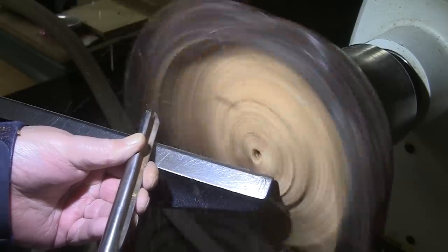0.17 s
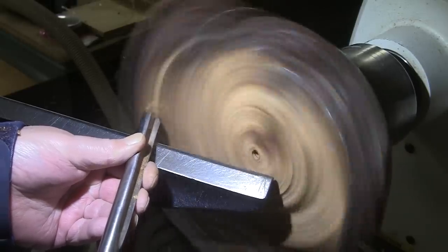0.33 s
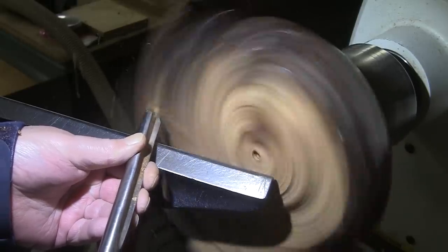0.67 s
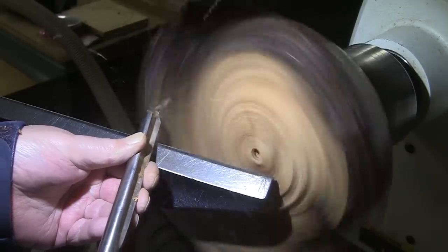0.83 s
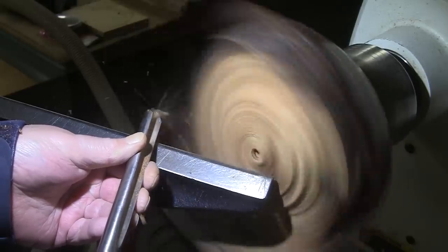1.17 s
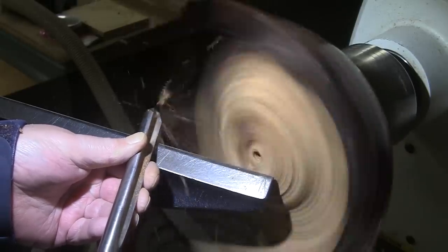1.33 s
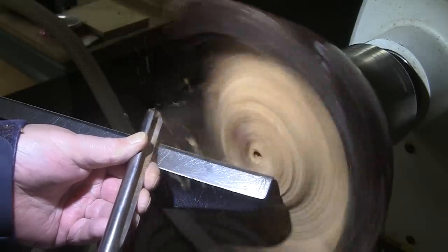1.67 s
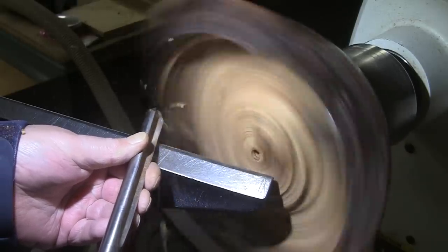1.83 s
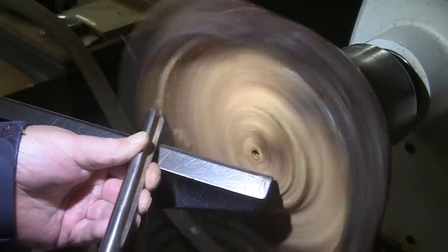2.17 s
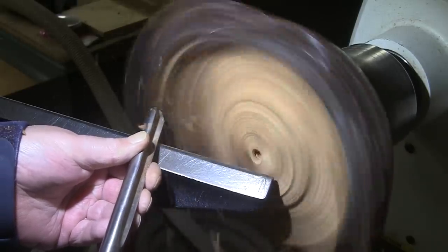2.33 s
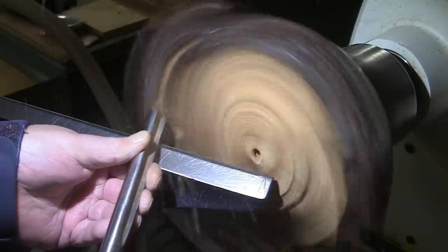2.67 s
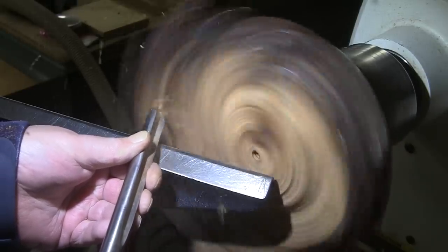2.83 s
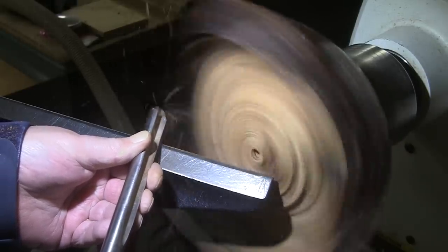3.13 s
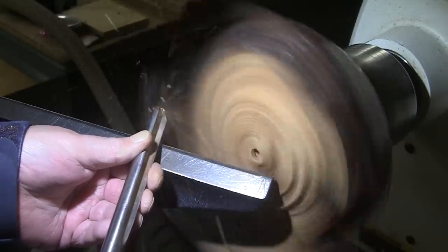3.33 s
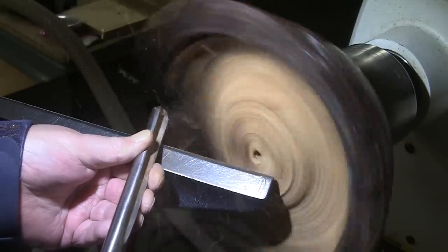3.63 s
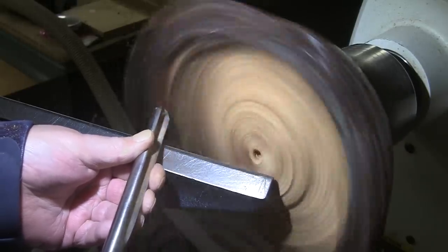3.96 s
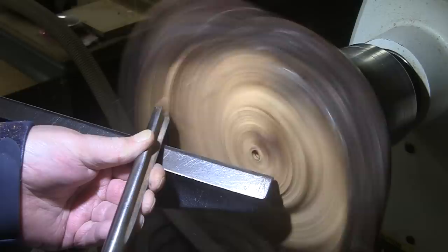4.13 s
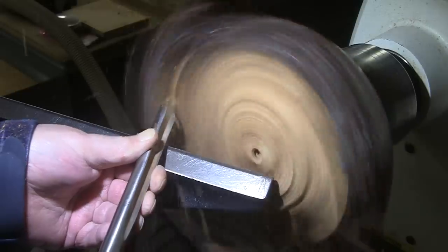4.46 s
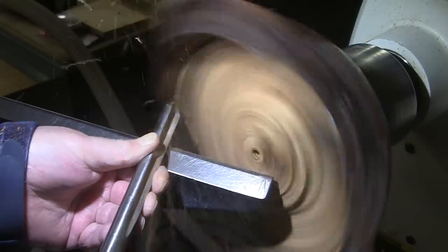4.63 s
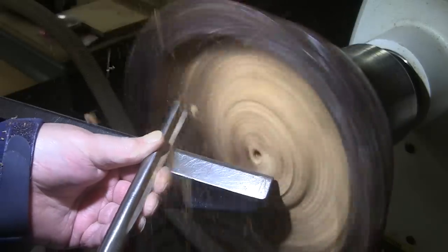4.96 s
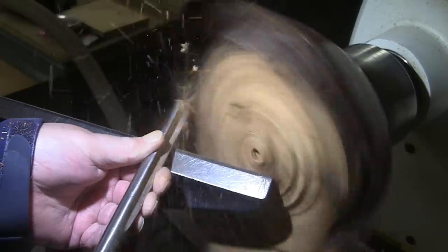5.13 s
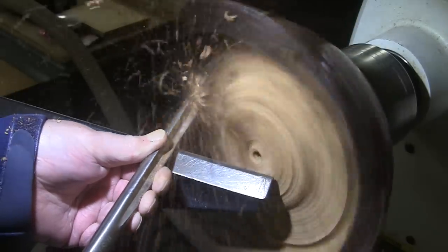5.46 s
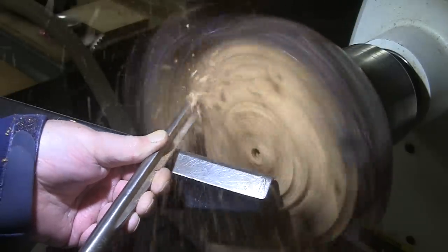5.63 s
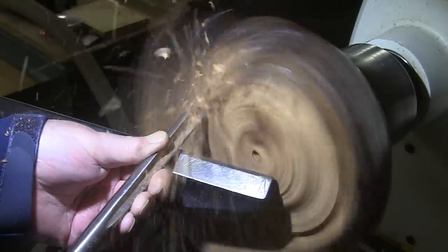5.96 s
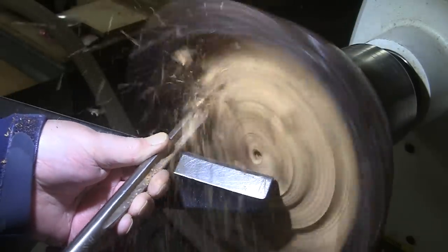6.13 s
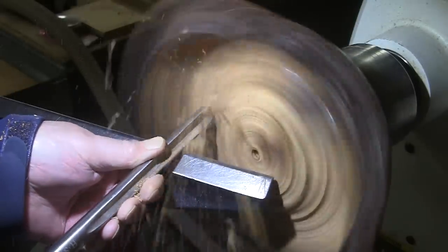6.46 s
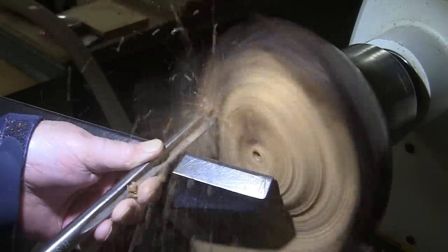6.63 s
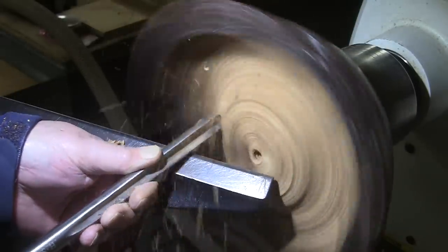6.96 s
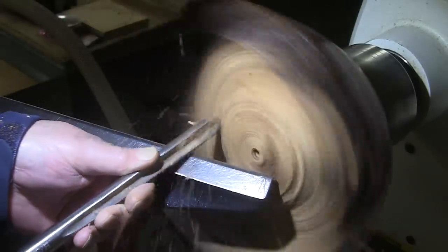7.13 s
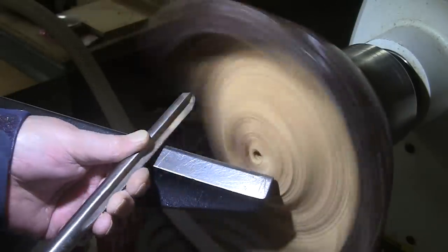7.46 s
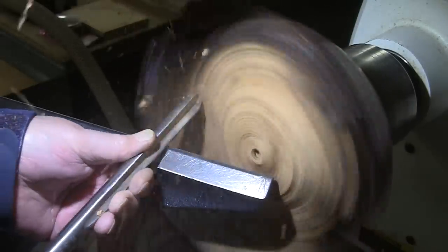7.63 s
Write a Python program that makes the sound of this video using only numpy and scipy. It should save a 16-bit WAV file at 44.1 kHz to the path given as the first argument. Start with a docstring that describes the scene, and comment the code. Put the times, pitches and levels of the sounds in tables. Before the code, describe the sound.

Close, fairly dry stereo in a workshop. From 0 to 4.2 s a gouge strikes a lopsided hardwood blank turning about nine times a second, giving two uneven bites per turn: a fast, regular, raspy chatter of torn fibres and bright splinters, with brief wavering rings of steel and wood. Force rises and falls with the hand, nearly dropping out around 0.55 s and easing near 4.1 s. Low frame rumble and faint bevel scraping run beneath. At 4.24 s it abruptly becomes sped-up: a thin buzzing hiss with a kilohertz drone and motor hiss. Clicks come around 5.0, 5.2 and 5.35 s; the shaving sizzle thickens through 6.3 s, with more knocks at 6.85 to 7.15 s. At 7.33 s cutting stops for about a tenth of a second, leaving motor hiss and whine; at 7.42 s the edge rattles back sharply and hisses to the end, about 7.8 s.

```python
"""A gouge roughs out a lopsided hardwood blank on a lathe: filtered noise gated into two end-grain bites a turn,
with wavering sine rings of gouge and blank, over frame rumble and bevel slide made of coloured noise.
At 4.24 s time jumps to eightfold speed: the bites merge into a buzzing hiss of noise pulsed at the turn rate,
the frame drones in the kilohertz and the motor hisses and whines. The cut deepens amid short knocks;
the gouge lifts off for a moment, then clatters back onto the wood."""
import sys
import numpy as np
from scipy import signal
from scipy.fft import rfft, irfft
from scipy.io import wavfile
from scipy.ndimage import uniform_filter1d, map_coordinates

SR = 44100
rng = np.random.default_rng(int(sys.argv[2]) if len(sys.argv) > 2 else 0)


def transcribe(signal):
    """Save signal, clipped to [-1, 1], as a 16-bit WAV file at the path in sys.argv[1]."""
    frames = np.atleast_2d(signal).T
    limited = np.clip(frames, -1, 1)
    pcm = np.round(limited * 32767).astype(np.int16)
    wavfile.write(sys.argv[1], SR, pcm)


N = 343539
TIME = np.arange(N) / SR
GRID_HZ = np.maximum(np.fft.rfftfreq(8192, 1 / SR), 1)   # frequencies on which filters are drawn
JUMP_S, LIFT_S, RETURN_S = 4.243, 7.325, 7.418   # time speeds up; gouge leaves the wood; gouge returns
TURN_S, SPEED_UP = 0.10853, 8   # one turn at natural speed, and the factor after the jump


def amp(db):
    """Logarithmic level: decibels to amplitude gain."""
    return 10 ** (np.asarray(db) / 20)


def unit(x):
    """Power normalisation: scale to rms 1."""
    return x / np.sqrt(np.mean(x ** 2) + 1e-20)


def in_time(rows):
    """Linear interpolation: each column of a time table at every sample."""
    seconds, *columns = np.transpose(rows)
    return [np.interp(TIME, seconds, column) for column in columns]


def on_grid(points):
    """Interpolation over log frequency: a table of (Hz, value) read on the filter grid."""
    hz, value = np.transpose(points)
    return np.interp(np.log(GRID_HZ), np.log(hz), value)


def after(s, fade_s=0.0049):
    """Linear gating: a switch whose ramp is centred on time s."""
    return np.clip((TIME - s) / fade_s + .5, 0, 1)


def drift(rate):
    """Slow random modulation of rms 1: rate draws a second, joined by lines; the last is held if they run out."""
    draws = rng.standard_normal(N // 8)
    return unit(np.interp(TIME * rate, np.arange(N // 8), draws))


def white():
    """Incoherence: two unrelated white noises."""
    return rng.standard_normal((2, N))


def fibres(rate, rough_db):
    """Intermittent fracture: fibres snap in clumps, so the noise strength fluctuates at the given rate."""
    return unit(white() * amp(rough_db * np.clip(drift(rate), -2, 2)))


def causal(x, gain):
    """Causality: a minimum-phase filter, built by folding the cepstrum, rings only after its cause."""
    cepstrum = irfft(np.log(np.maximum(gain, 1e-5)))
    half = len(cepstrum) // 2
    cepstrum[1:half] *= 2
    cepstrum[half + 1:] = 0
    response = irfft(np.exp(rfft(cepstrum)))[:half]
    return signal.oaconvolve(np.atleast_2d(x), response[None], axes=-1)[:, :N]


def colour(x, spectrum, peaks=()):
    """Source and resonance: a smooth spectrum carries Lorentzian peaks; white noise keeps its power."""
    octaves_above = np.maximum(np.log2(GRID_HZ / spectrum[-1][0]), 0)
    db = on_grid(spectrum) - 30 * octaves_above   # 30 dB per octave beyond the last point
    for hz, width, height in peaks:
        bell = 1 / (1 + (2 * (GRID_HZ - hz) / width) ** 2)
        db = db + 10 * np.log10(1 + (amp(height) ** 2 - 1) * bell)
    return causal(x, unit(amp(db)))


def resonance(hz, width):
    """Modal resonance: the bell-shaped gain of one mode on the filter grid."""
    return unit(1 / (1 + (2 * (GRID_HZ - hz) / width) ** 2))


def stereo(pair, likeness, balance):
    """Interchannel coherence: sum and difference of two signals are left and right, alike as each band demands."""
    alike = np.clip(on_grid(likeness), -.9, .995)
    lean_db = on_grid(balance)
    side = causal(pair[1], np.sqrt((1 - alike) / (1 + alike)))[0]
    left = causal(pair[0] + side, amp(lean_db / 2))
    right = causal(pair[0] - side, amp(-lean_db / 2))
    return np.vstack([left, right])


# The hand on the gouge, which also loads the frame. Each row: time in seconds, lean into the wood from 0 to 1,
# force in dB.
HAND_ON_GOUGE = [(0, 0.54, 2.5), (.115, 0.78, 1), (.3, 0.33, 4.5), (.5, .5, 0.5), (.555, 0, -9),
                 (.605, 0.58, 0.5), (.72, .5, -2), (.82, 1, -1), (.87, 1, -3.5), (.93, 0.66, 1.5),
                 (1.08, 0.28, 0), (1.3, 0.61, 1.5), (1.47, 0.95, -1.5), (1.57, .99, -1.5),
                 (1.95, 0.53, -0.1), (2.12, 0.44, 4.5), (2.28, 0.36, 0), (2.62, 0.96, -0.5),
                 (2.85, 0.59, 2), (3.05, 0.26, 2), (3.45, 0.36, 3.5), (3.54, 0.88, -1), (3.64, 0.99, -1.5),
                 (3.8, 0.59, 3), (3.97, 0.24, 4.5), (4.08, .12, -4.5), (4.18, .9, -4)]
# The two end-grain sides of the blank. Each row: first contact in seconds from the start of a turn, level in dB,
# level added at full lean in dB, gouge ring in dB and blank ring in dB relative to the bite.
END_GRAIN_SIDES = [(0.0008, -28, 14.5, -1.5, -13), (0.0504, -20.5, 5, 0, -16)]
# a light touch swells slowly, a full lean hits at once and tears longer
LIGHT_RISE_S, FULL_RISE_S, LIGHT_FALL_S, FULL_FALL_S = 0.018, 0.00073, 0.0096, 0.015
SUDDEN_LEAN, LEAN_SPREAD = 0.96, 0.044   # lean from which the edge hits at once; chance the grain adds to it
CRACK_DB, CRACK_S = 1.5, 0.0017   # crack at the peak of a bite: level added at full lean, and decay
SPLINTER_SHARE_DB = -7
SPLINTER_LOSS_DB = 0.24   # dB of splinter share lost per dB of force: pushing tears more than it splinters
GOUGE_DAMPING_DB = 1.5   # ring of the gouge lost at full lean
BITE_SPREAD_DB, SPLINTER_SPREAD_DB, RING_SPREAD_DB = .5, 2.5, 2


def bite_forces():
    """Periodic impact: end grain meets the edge twice a turn, and the lean sets strength, rise and fall.
    Gives the drives of tearing, splinters, gouge and blank, and the chance grip of each bite."""
    lean_at, force_at = in_time(HAND_ON_GOUGE)
    drives, grip = np.zeros((4, N)), np.zeros(N)
    for turn_start in np.arange(0, JUMP_S - TURN_S / 2, TURN_S):
        for first_s, db, lean_db, gouge_db, blank_db in END_GRAIN_SIDES:
            s = turn_start + first_s
            chance = rng.standard_normal(size=6).clip(-2, 2)
            start = max(int(s * SR), 0)
            span = slice(start, start + SR // 12)
            lean, force = np.clip(lean_at[start], 0, 1), force_at[start]

            abrupt = np.clip(lean / SUDDEN_LEAN + LEAN_SPREAD * chance[5], 0, 1)
            rise = max(LIGHT_RISE_S + (FULL_RISE_S - LIGHT_RISE_S) * abrupt, 1 / SR)
            fall = LIGHT_FALL_S + (FULL_FALL_S - LIGHT_FALL_S) * lean
            t = TIME[span] - s
            shape = np.clip(t / rise, 0, 1) * np.exp(-(np.maximum(t - rise, 0) / fall) ** 2)
            shape = shape * amp(CRACK_DB * lean * np.exp(-np.abs(t - rise) / CRACK_S))

            level = db + force + lean_db * lean + BITE_SPREAD_DB * chance[0]
            splinter_db = SPLINTER_SHARE_DB - SPLINTER_LOSS_DB * force + SPLINTER_SPREAD_DB * chance[1]
            shaft_db = gouge_db - GOUGE_DAMPING_DB * lean + RING_SPREAD_DB * chance[2]
            bowl_db = blank_db + RING_SPREAD_DB * chance[3]
            shares = [0, splinter_db, shaft_db, bowl_db]
            drives[:, span] += amp(level) * amp(shares)[:, None] * shape
            grip[span] = chance[4]
    return drives, grip


def grain_colour(x, change_db=2.5):
    """Varying contact resonance: the grain favours now one band, now another, about as often as the bites come."""
    for hz in np.geomspace(2200, 6000, 5):
        band = signal.lfilter(*signal.iirpeak(hz, 5, fs=SR), x)
        x = x + band * (amp(change_db * np.clip(drift(18), -2, 2)) - 1)
    return x


def ringing(drive, hz, lag_s, waver, side_angle):
    """Forced vibration: a wavering tone follows the force with a lag, left and right out of phase."""
    phase = 2 * np.pi * np.cumsum(hz * (1 + waver * drift(400))) / SR
    swing = np.interp(TIME - lag_s, TIME, drive) * amp(4.0 * drift(300))
    return np.sqrt(2) * swing * np.array([np.sin(phase), np.sin(phase + side_angle)])


# Spectrum of tearing wood. Each row: frequency in Hz, relative level in dB.
TEARING_SPECTRUM = [(100, -26.5), (250, -20.5), (480, -16.5), (680, -4), (950, -20), (1450, -11),
                    (2200, -0.5), (3400, -0.5), (4800, -5.5), (6000, -9), (8000, -9)]
# Resonances of blank and tool rest. Each row: frequency in Hz, width in Hz, height in dB.
TEARING_RESONANCES = [(2285, 310, 3.4), (2720, 46, 0.6), (3110, 106, 7.4), (3915, 190, 5.3),
                      (5380, 220, 6.1)]
# Spectrum of splinters. Each row: frequency in Hz, relative level in dB.
SPLINTER_SPECTRUM = [(1500, -61), (3500, -44), (6000, 0), (7500, 1.5), (9000, -2), (12500, -2.5),
                     (15800, -11.5)]
GOUGE_HZ, BLANK_HZ = 1768, 1171
CHIPS_PER_S, CHIP_DB = 260, 2   # a bite breaks off in chips of uneven strength


def bites(tear_db=1.0, splinter_db=1.5, gouge_db=-5.0, blank_db=-2.0):
    """Brittle fracture: bites tear fibres and throw bright splinters; gouge shaft and blank ring a moment later."""
    (tear, splinter, gouge, blank), grip = bite_forces()
    tear = tear * amp(CHIP_DB * np.clip(drift(CHIPS_PER_S), -1.5, 1.2))
    torn = colour(fibres(rate=1400, rough_db=2.5) * tear, TEARING_SPECTRUM, TEARING_RESONANCES)
    wood = amp(tear_db) * grain_colour(torn)
    thrown = fibres(rate=2000, rough_db=3.5) * splinter
    chips = amp(splinter_db) * colour(thrown, SPLINTER_SPECTRUM, [(7900, 17, 4.1)])
    # the grip of each bite detunes both rings
    shaft = ringing(gouge, GOUGE_HZ * (1 + 0.0117 * grip), lag_s=0.0033, waver=0.0189, side_angle=-0.87)
    bowl = ringing(blank, BLANK_HZ * (1 + 0.01524 * grip), lag_s=0.0027, waver=0.0345, side_angle=-1.64)
    return wood + chips + amp(gouge_db) * shaft + amp(blank_db) * bowl


def workshop(x, t60=0.16, wet_db=-15):
    """Reverberation: bench and walls add a short, exponentially decaying noise tail."""
    t = TIME[:SR // 3]
    tail = rng.standard_normal((2, len(t))) * amp(-60 * t / t60) * (t > .004)
    tail /= np.sqrt(np.sum(tail ** 2, axis=1, keepdims=True))
    return x + amp(wet_db) * signal.oaconvolve(x, tail, axes=-1)[:, :N]


# Spectrum of the frame rumble. Each row: frequency in Hz, relative level in dB.
FRAME_SPECTRUM = [(30, -41), (62, -31), (92, -4), (125, -10.5), (185, 3), (290, -3), (420, -2),
                  (560, -15.5), (800, -9), (1100, -21)]
# Modes of the frame. Each row: frequency in Hz, width in Hz, height in dB.
FRAME_MODES = [(177.4, 26, 7.3), (260.6, 6.8, 7.7), (328, 16, 4), (372, 21.6, 8.7), (489, 15, 9.5),
               (631, 34, 11.7), (814, 5.6, 13)]
# Spectrum of the sliding bevel. Each row: frequency in Hz, relative level in dB.
SLIDE_SPECTRUM = [(500, -17.5), (1200, 4), (1800, 3), (3300, 3), (5000, -6.5), (8000, -11), (15800, -16)]
# the frame shakes harder shortly after the gouge leans in
SHAKE_DB, SHAKE_LEAN_DB, SHAKE_LAG_S = -40.5, 7, 0.11


def lathe(slide_db=-38.5):
    """Forced vibration and friction: the unbalanced blank shakes the frame, more under load; the bevel slides on."""
    lean, _ = in_time(HAND_ON_GOUGE)
    load = np.interp(TIME - SHAKE_LAG_S, TIME, lean)
    rumble = amp(SHAKE_DB + SHAKE_LEAN_DB * load) * colour(white(), FRAME_SPECTRUM, FRAME_MODES)
    slide = amp(slide_db + 3.4 * drift(24.13)) * colour(white(), SLIDE_SPECTRUM)
    return rumble + slide


def surface(turns, memory, size=600):
    """Periodic excitation: the wood's relief under the edge mostly repeats from turn to turn."""
    fresh = rng.standard_normal((size + size // 2, size))   # one row a turn
    relief = signal.lfilter([1], [1, -memory], fresh, axis=0)
    return unit(map_coordinates(relief.ravel(), [turns * size], order=3, mode="wrap"))


def pulses(turns, pulsing, second, sharpness):
    """Amplitude modulation: two swells of force a turn over steady pressure, flickering; mean power near 1."""
    swing = np.cos(2 * np.pi * turns)
    lobes = np.exp(sharpness * (swing - 1)) + second * np.exp(-sharpness * (swing + 1))
    pulsing = np.clip(pulsing, 0, .98)
    force = 1 - pulsing + pulsing * lobes
    steady = force / np.sqrt(uniform_filter1d(force ** 2, size=3000))
    return steady * amp(1.2 * np.clip(drift(150), -2, 1.6))


# Levels of fast cutting. Each row: time in seconds, rubbing in dB, shaving hiss in dB, before the surges.
FAST_LEVELS = [(4.25, -35.5, -31.5), (4.65, -37.5, -29), (4.92, -37.5, -32), (5.0, -32.5, -31),
               (5.14, -37, -28), (5.29, -40.5, -34.5), (5.35, -41.5, -30.6), (5.5, -41, -30),
               (5.6, -37, -28.5), (5.9, -35, -28.1), (6.3, -34, -25.5), (6.65, -35.5, -26.5),
               (6.8, -31, -27), (7.05, -27, -30.5), (7.15, -30.7, -29.5), (7.3, -28.5, -33),
               (7.43, -29.5, -26), (7.485, -23, -27.5), (7.54, -35, -23), (7.72, -39, -27.5),
               (7.78, -37, -27.5)]
# The fast stroke. Each row: time in seconds, depth of cut from 0 to 1, strength of the second bite from 0 to 1.
CUT_DEPTH = [(4.25, .12, 0.55), (4.85, 0.19, 0.6), (5.05, 0.56, 0.75), (5.8, 0.78, 0.53), (6.4, 1, 0.3),
             (7.3, 0.94, 0.01), (7.42, 0.06, 0.75), (7.78, 0.62, 0.1)]
# Spectrum of rubbing at speed. Each row: frequency in Hz, relative level in dB.
RUB_SPECTRUM = [(60, -31.5), (250, -35.5), (500, -30.5), (780, -7), (1020, -14), (1550, 1.5), (2300, -2),
                (3200, -4.5), (3600, -4.5), (4600, -6), (5600, -3.5), (6300, -1.5), (7200, -8.5),
                (11000, -33)]
# Frame resonances in the rubbing. Each row: frequency in Hz, width in Hz, height in dB.
RUB_RESONANCES = [(1307, 65, 2.5), (1908, 24, 6.9), (2170, 71, 4.4), (2864, 100, 7.2), (3008, 51, 12.2)]
# The frame's lowest pair of modes at speed. Each row: frequency in Hz, width in Hz, relative level in dB.
FRAME_DRONE_MODES = [(1398, 45, 0), (1460, 45, 1)]
# Spectrum of the shaving hiss. Each row: frequency in Hz, relative level in dB.
SHAVING_SPECTRUM = [(600, -51), (2000, 3), (4500, -10), (5700, 4), (7000, -22), (8150, -7.5), (8650, -0.5),
                    (11400, -7.5), (13100, -7), (15800, -2)]
# Shaving resonances in a light cut. Each row: frequency in Hz, width in Hz, height in dB.
LIGHT_CUT_RESONANCES = [(9530, 1500, 8.7), (10300, 440, 3.6), (12000, 220, 11), (13900, 930, 18.6)]
# Shaving resonances in a deep cut. Each row: frequency in Hz, width in Hz, height in dB.
DEEP_CUT_RESONANCES = [(10560, 350, 13.1), (12250, 300, 16.5), (13900, 190, 10.3), (14880, 330, 9.8)]
FAST_SAG, DEEP_SMOOTHING = .006, 0.41   # shares by which a full cut slows the spindle and fills gaps between bites
WOBBLE = .0014   # share by which the spindle speed wavers
RING_HZ, RING_WIDTH_HZ, RING_DEPTH_DB = 6520, 160, 15.5   # tool rest, and ring level added by a full cut
DRONE_AT_DB, DRONE_GROWTH = -31, 1.37   # rubbing level where the drone is as set; dB of drone per dB of rubbing
DRONE_REPEAT = .55   # share of the drone's driving power that comes from the relief


def fast_cut(shave_db=0.0, ring_db=-49.0, drone_db=-36.5, rub_surge_db=0.9, shave_surge_db=.5):
    """Periodicity pitch: the turn rate buzzes in rub and hiss; the tool rest and frame resonate with the load."""
    rubbing, shaving = in_time(FAST_LEVELS)
    surge = drift(18)   # the hand's pushes, felt most in the rubbing
    rubbing, shaving = rubbing + rub_surge_db * surge, shaving + shave_surge_db * surge
    depth, second = np.clip(in_time(CUT_DEPTH), 0, 1)
    pulsing = 1 - DEEP_SMOOTHING * depth
    turns = np.cumsum(SPEED_UP / TURN_S * (1 - FAST_SAG * depth + WOBBLE * drift(40))) / SR
    contact = after(JUMP_S) - after(LIFT_S, fade_s=0.0076) + after(RETURN_S)

    push = contact * pulses(turns, pulsing, second, sharpness=1.07)
    relief = np.array([surface(turns, memory=.76), rng.standard_normal(N)])
    rub = colour(relief * push * amp(rubbing + 2.4 * drift(700)), RUB_SPECTRUM, RUB_RESONANCES)
    ring_drive = white() * push * amp(ring_db + RING_DEPTH_DB * depth ** 2)
    ring = causal(ring_drive, resonance(RING_HZ, RING_WIDTH_HZ))

    frame = unit(sum(amp(db) * resonance(hz, width) for hz, width, db in FRAME_DRONE_MODES))
    uneven = np.sqrt(DRONE_REPEAT) * relief + np.sqrt(1 - DRONE_REPEAT) * white()
    drone_level = amp(drone_db + DRONE_GROWTH * (rubbing - DRONE_AT_DB))
    drone = causal(uneven * contact * drone_level, frame)

    peel = contact * pulses(turns, pulsing, second, sharpness=3.2) * amp(shaving + shave_db)
    light_peel = fibres(rate=6500, rough_db=2.0) * peel * np.sqrt(1 - depth)
    deep_peel = fibres(rate=3100, rough_db=3.0) * peel * np.sqrt(depth)
    light = colour(light_peel, SHAVING_SPECTRUM, LIGHT_CUT_RESONANCES)
    deep = colour(deep_peel, SHAVING_SPECTRUM, DEEP_CUT_RESONANCES)
    return rub + ring + drone + light + deep


# Level of the running lathe at speed. Each row: time in seconds, level in dB.
RUNNING_LEVEL = [(4.25, -41.5), (7.3, -44.5), (7.36, -35), (7.45, -37), (7.79, -44)]
# Spectrum of belt and bearings. Each row: frequency in Hz, relative level in dB.
MOTOR_SPECTRUM = [(30, -7), (250, -12.5), (450, -5.5), (800, 2), (1400, 9.5), (2400, 8), (5800, 8),
                  (9800, 4.5), (11500, 6), (15800, -3)]
# Whines coloured into the hiss. Each row: frequency in Hz, width in Hz, height in dB.
MOTOR_WHINES = [(369, 6.3, 15), (3140, 64, 9.7), (8000, 60, 5.4), (9240, 54, 12)]
WHINE_HZ = 3924


def motor(whine_db=-6.5, loaded_db=-13, waver_hz=12):
    """Rotating machinery: belt and bearings hiss; the drive's tone is plainest while the blank spins free."""
    level, = in_time(RUNNING_LEVEL)
    free = after(LIFT_S) - after(RETURN_S, fade_s=0.025)
    phase = 2 * np.pi * np.cumsum(WHINE_HZ + waver_hz * drift(120)) / SR
    whine = np.sqrt(2) * np.sin(phase) * amp(whine_db + loaded_db * (1 - free))
    hiss = colour(white(), MOTOR_SPECTRUM, MOTOR_WHINES)
    return amp(level) * (hiss + whine * np.array([[1], [0]]))   # whine in the first of the pair only


# Knocks of the edge on the wood, the last two as the gouge lands again. Each row: start in seconds, crack in dB,
# frame knock in dB, before trims.
EDGE_KNOCKS = [(4.9812, -29, -12.5), (5.21, -30, -21), (5.228, -26, -23), (5.355, -27, -21),
               (6.85, -18, -21), (7.025, -33, -18), (7.042, -28, -17), (7.138, -30, -11),
               (7.418, -17, -22.5), (7.479, -18, -9.5)]
# Spectrum of the crack. Each row: frequency in Hz, relative level in dB.
CRACK_SPECTRUM = [(400, -47), (3000, -22), (5500, -30), (7500, -24), (9600, 16.5), (11500, 1), (14000, 0),
                  (15800, 12.5)]
# Spectrum of a knock in the frame. Each row: frequency in Hz, relative level in dB.
FRAME_KNOCK_SPECTRUM = [(60, -25), (300, -26.5), (750, -6.5), (1050, -6), (1600, 5), (3000, -2.5),
                        (4500, -9), (6200, 0), (8000, -8.5), (12000, -10)]
# Modes of the frame that a knock brings out. Each row: frequency in Hz, width in Hz, height in dB.
FRAME_KNOCK_MODES = [(1390, 80, 2), (2620, 59, 13)]


def knocks(top_db=6.5, body_db=2.0, decay_s=.0012):
    """Impulse response: the edge slaps the wood, and each very short burst also rings the frame."""
    top, body = np.zeros((2, N))
    t = TIME[:SR // 50]
    burst = np.exp(-t / decay_s) * np.minimum(t / 0.00024, 1)
    for s, crack_db, frame_db in EDGE_KNOCKS + bounces():
        span = slice(int(s * SR), int(s * SR) + len(t))
        top[span] += burst * amp(crack_db + top_db)
        body[span] += burst * amp(frame_db + body_db)
    crack = colour(white() * top, CRACK_SPECTRUM)
    return crack + colour(white() * body, FRAME_KNOCK_SPECTRUM, FRAME_KNOCK_MODES)


BOUNCE_CRACK_DB, FIRST_BOUNCE_FRAME_DB, LAST_BOUNCE_FRAME_DB = -13, -27, -21   # before the trims of the knocks


def bounces(count=7):
    """Repeated impact: the returning edge hits once a turn, shaking the frame more each time; rows like knocks."""
    frame_db = np.linspace(FIRST_BOUNCE_FRAME_DB, LAST_BOUNCE_FRAME_DB, count)
    return [(RETURN_S + k * TURN_S / SPEED_UP, BOUNCE_CRACK_DB, frame_db[k]) for k in range(count)]


# Left-right likeness at natural speed. Each row: frequency in Hz, likeness from -1 to 1.
NATURAL_LIKENESS = [(100, 1), (300, .94), (640, 0.9), (1400, 0.16), (3000, 1), (5500, 0.5), (15000, .5)]
# Left-right balance at natural speed. Each row: frequency in Hz, left over right in dB.
NATURAL_BALANCE = [(200, -3.5), (700, -3), (1150, -4.5), (2000, -1.5), (8000, 0.5), (15000, -3)]
# Left-right likeness of the rush. Each row: frequency in Hz, likeness from -1 to 1.
RUSH_LIKENESS = [(100, 0.61), (640, 1), (3000, 1), (6800, 0.74), (10000, 0.57), (15000, 0.2)]
# Left-right balance of the rush. Each row: frequency in Hz, left over right in dB.
RUSH_BALANCE = [(300, -0.5), (1300, -5), (2400, -2), (4400, -1.5), (15000, -2)]


def scene():
    """Superposition: single bites at natural speed, then the eightfold rush."""
    left, right = stereo(workshop(bites()) + lathe(), NATURAL_LIKENESS, NATURAL_BALANCE)
    natural = np.array([left, np.roll(right, 2)])   # the right lags by two samples: the cut is nearer the left
    rushed = stereo(fast_cut() + knocks() + motor(), RUSH_LIKENESS, RUSH_BALANCE)
    return natural * (1 - after(JUMP_S)) + rushed * after(JUMP_S)


CUTOFF_HZ = 15800


def record(dry):
    """Clipping and band limiting: peaks stop at full scale and the top is cut steeply."""
    low_pass = signal.firwin(601, CUTOFF_HZ, fs=SR, window=("kaiser", 9))
    return signal.oaconvolve(np.clip(dry, -1, 1), low_pass[None], mode="same", axes=-1)


dry = scene()
out = record(dry)
transcribe(out)
```